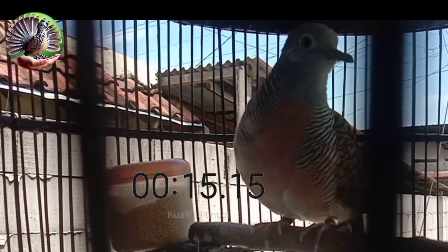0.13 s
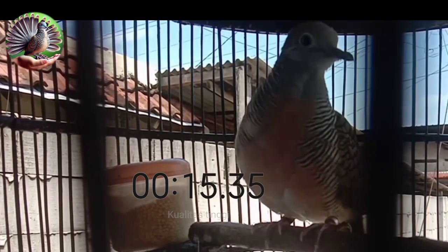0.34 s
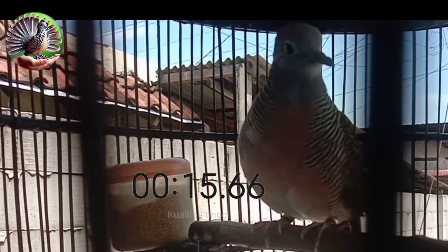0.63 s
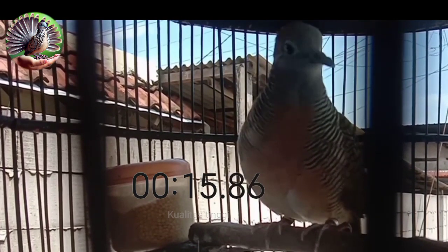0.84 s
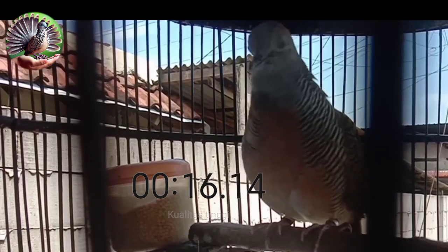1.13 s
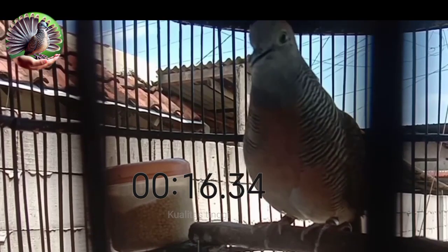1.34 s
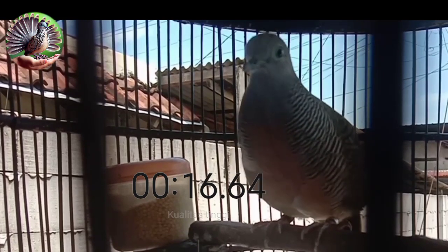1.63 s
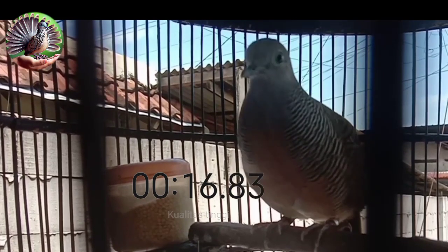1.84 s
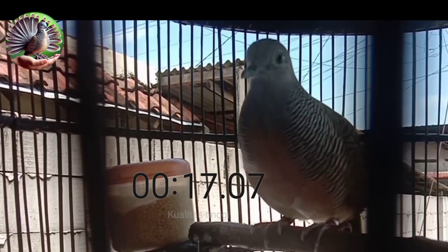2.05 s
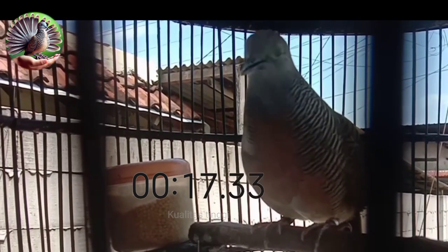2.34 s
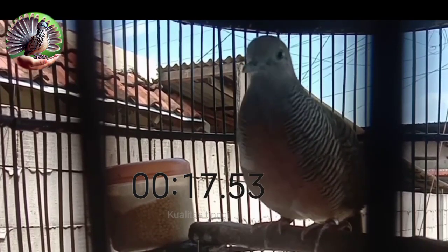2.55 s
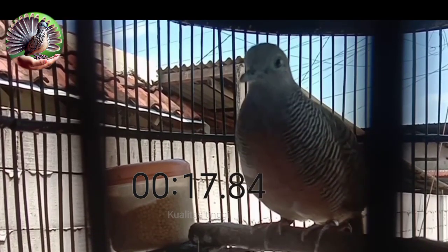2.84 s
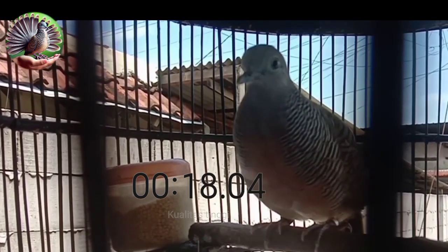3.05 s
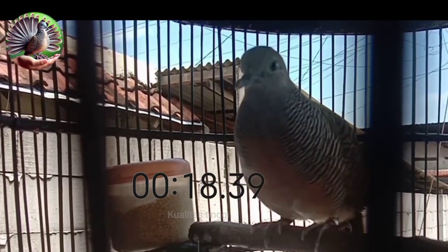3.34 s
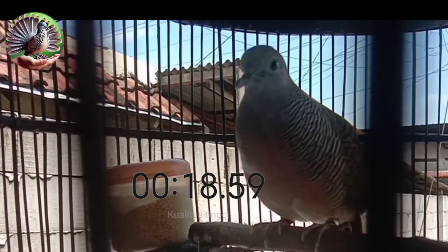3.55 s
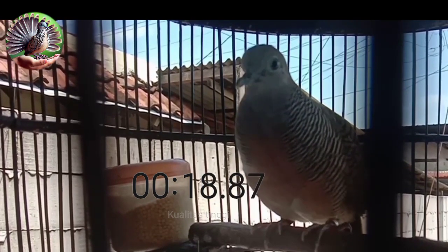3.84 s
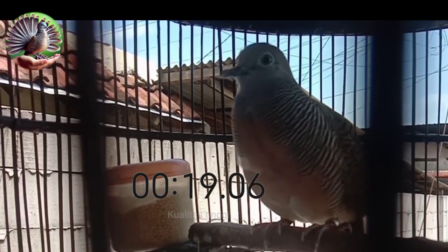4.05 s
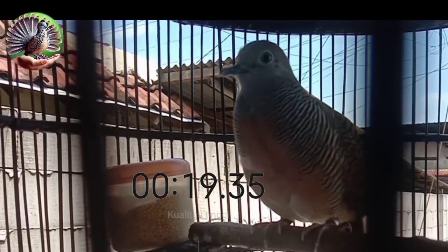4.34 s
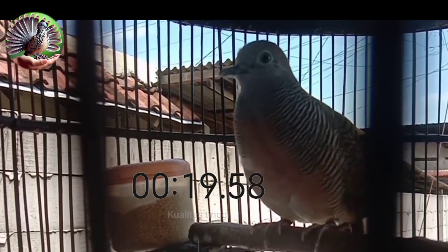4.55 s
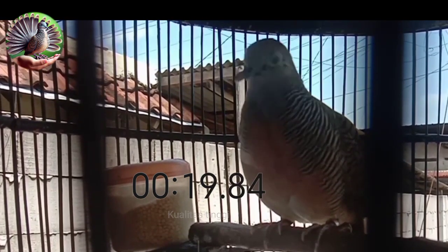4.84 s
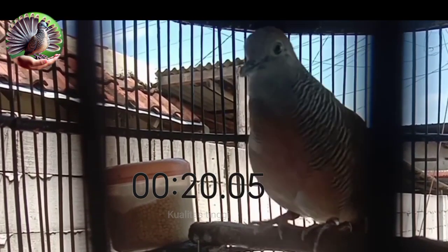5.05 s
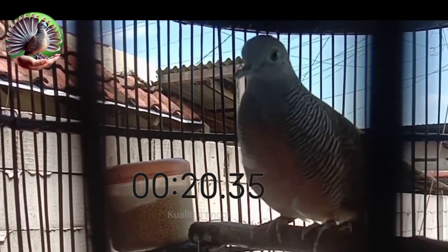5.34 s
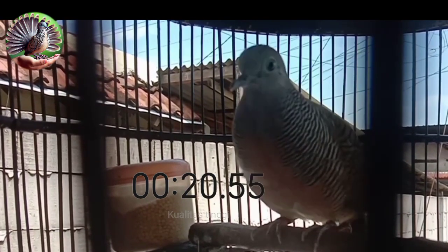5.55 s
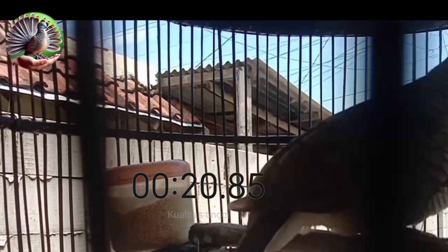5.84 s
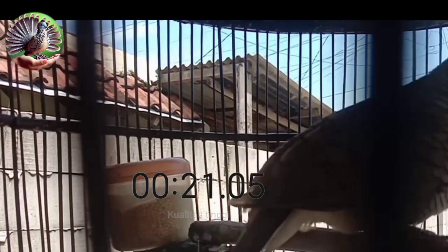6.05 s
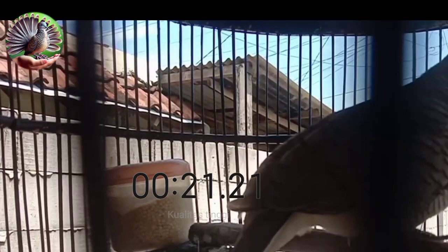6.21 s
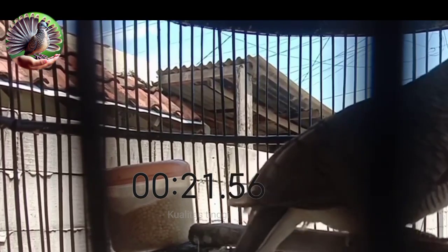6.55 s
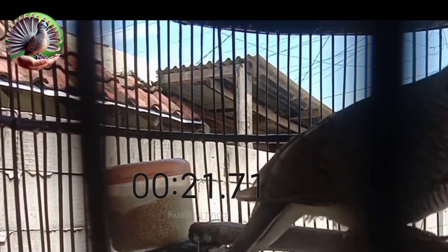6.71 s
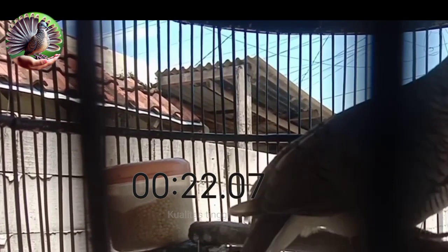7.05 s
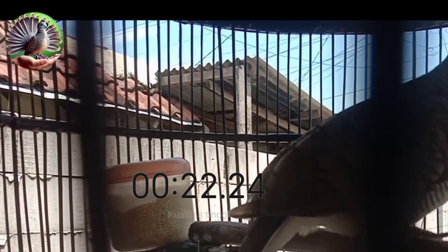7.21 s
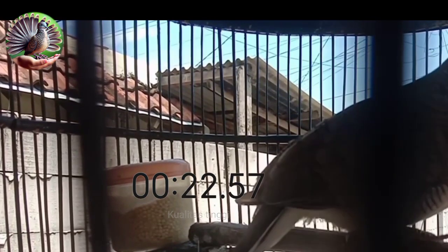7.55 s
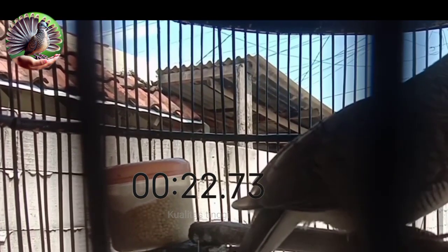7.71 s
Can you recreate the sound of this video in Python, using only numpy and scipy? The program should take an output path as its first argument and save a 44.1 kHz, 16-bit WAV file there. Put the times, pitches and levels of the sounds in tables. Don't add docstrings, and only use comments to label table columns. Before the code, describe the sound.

An outdoor walled yard, heard through a phone microphone close to a cage, with light hiss. From 0 to 1.5 s, low, uneven traffic rumble and hum lie behind small clear notes from a neighbouring dove and fainter distant coos; a tiny scrape comes near 0.2 s. At 1.5 s the near dove rasps and fires six loud, hollow, popping notes until 2.1 s, pitched mostly around 1.2 to 1.3 kHz, the last longer. A second six-note phrase runs 2.5-3.35 s, slightly slower. Cage and walls ring briefly. Traffic roar rises from 3 s while distant doves murmur. The third phrase comes at 5.3-5.9 s. As it ends, a close engine swells in, covering the fading road: about thirty low thumps per second, boomy pipe resonance and dense clatter, strongest thumping near 6.2 s, clatter fullest around 7.2 s, continuing to 8 s. Faint bright scrapes occur at 6.3, 7.1 and 7.7 s.

```python
import sys
import numpy as np
from scipy import signal
from scipy.fft import rfft, irfft, next_fast_len
from scipy.io import wavfile
from scipy.ndimage import uniform_filter1d

SR = 44100
rng = np.random.default_rng(int(sys.argv[2]) if len(sys.argv) > 2 else 0)


def persist_wave(psi):
    counts = np.round(np.clip(psi, -1, 1) * 32767).astype(np.int16)
    wavfile.write(sys.argv[1], SR, np.atleast_2d(counts).T)


def decibels_to_gain(level_db):
    exponent = np.asarray(level_db, float) / 20
    return 10 ** exponent


N = 347419
T = np.arange(N) / SR

# start [s], held tone [s], first pitch [Hz], top pitch [Hz], glide level [dB]
DOVE_NOTES = [(1.583, .04, 892, 1300, -14.5), (1.656, 0.03, 991, 1277, -13.5),
              (1.714, .028, 944, 1247, -13), (1.785, .026, 725, 1221, -13),
              (1.882, 0.036, 752, 1237, -13.5), (2.002, 0.092, 724, 1289, -13),
              (2.596, 0.044, 889, 1291, -15), (2.684, 0.027, 775, 1245, -13.5),
              (2.769, .027, 730, 1233, -13), (2.875, 0.039, 713, 1251, -14),
              (3.005, 0.095, 730, 1284, -14.5), (3.24, 0.091, 794, 1281, -14),
              (5.379, 0.035, 930, 1296, -14), (5.451, 0.035, 986, 1280, -13.5),
              (5.504, 0.033, 941, 1237, -13.5), (5.581, 0.033, 759, 1221, -14.5),
              (5.682, 0.037, 734, 1236, -13.5), (5.806, 0.09, 706, 1279, -15)]


def unit(x):
    return x / np.sqrt(np.mean(x ** 2))


def colour(x, points):
    hz, db = np.transpose(points)
    size = next_fast_len(len(x))
    f = np.arange(size // 2 + 1) * SR / size + 1
    gain = decibels_to_gain(np.interp(np.log(f), np.log(hz), db, left=-90, right=-90))
    return irfft(rfft(x, size) * gain, size)[:len(x)]


def walk(rate):
    k = max(int(SR / rate), 130)
    held = np.repeat(rng.standard_normal(N // 128), k)[:N]
    return uniform_filter1d(uniform_filter1d(held, k), k)


def band(hz, width):
    b, a = signal.iirpeak(hz, hz / width, SR)
    once = signal.lfilter(b, a, rng.standard_normal(N))
    return unit(signal.lfilter(b, a, once))


def patchy(points, flicker_db, rate):
    spread, size = np.log(2) / 3, next_fast_len(N)
    f = np.log(np.arange(size // 2 + 1) * SR / size + 1)
    full = rfft(colour(rng.standard_normal(N), points), size)
    out = np.zeros(N)
    for centre in np.arange(np.log(points[0][0]), np.log(points[-1][0]) + spread, spread):
        share = np.clip(1 - abs(f - centre) / spread, 0, 1)
        out += irfft(full * share, size)[:N] * decibels_to_gain(flicker_db * walk(rate))
    return unit(out)


def bump(start, length, edge):
    return np.sin(np.pi / 2 * np.clip(np.minimum(T - start, start + length - T) / edge, 0, 1)) ** 2


def yard(x, t60, wet_db):
    t = np.arange(SR) / SR
    tail = colour(rng.standard_normal(SR), [(100, 26.5), (1400, -4.5), (2400, -7), (8000, -25)])
    tail = tail * decibels_to_gain(-60 * t / t60) * np.clip(t / .05, 0, 1)
    return decibels_to_gain(wet_db) * signal.fftconvolve(x, tail / np.sqrt(np.sum(tail ** 2)))[:N]


def microphone():
    # frequency [Hz], density [dB per Hz]
    hiss = [(3000, 4), (5000, 2.5), (6500, -4), (8000, -6), (10500, -2.5), (13000, -6.5), (15600, -8.5)]
    # frequency [Hz], level [dB]
    whine = [(6722, -103), (13443, -99)]
    out = decibels_to_gain(-80) * decibels_to_gain(1.6 * walk(14)) * patchy(hiss, 1.5, 9)
    return out + sum(decibels_to_gain(db + 3) * np.sin(2 * np.pi * hz * T) for hz, db in whine)


def traffic():
    # time [s], level
    # [dB]
    flow = [(0, -10), (.6, -6.5), (1.3, -7.5), (1.6, -11.5), (1.82, -21), (2.0, -9.5), (2.5, -7.5),
            (3.0, 5), (3.33, -5), (3.45, 3.5), (3.9, 3), (4.4, 2.5), (4.9, -1.5), (5.3, 2), (5.9, -6)]
    # start [s], length [s], gain [dB]
    lorries = [
        (.1, 0.12, 11.5),
        (.6, 0.33, 6),
        (0.998, 0.19, 4.5),
        (1.31, 0.25, 7),
        (2.454, 0.17, 6),
        (3.4, .25, 4),
        (4.36, .2, 1),
    ]
    # frequency [Hz], density [dB per Hz]
    rumble = [(12, -55), (20, -24), (38, -30), (64, -7.5), (141, -1.5), (159, -0.5), (182, -8),
              (260, -12.5), (340, -48.5), (570, -120)]
    hum = [(120, -43.5), (200, -15), (279, -13), (377, -3.5), (591, -5.5), (736, -7.5), (880, -5.5),
           (1070, -31.5), (1230, -1.5), (1400, -27.5), (1820, -45.5), (3080, -120)]
    tyres = [(900, -3.5), (1270, 8), (1500, -1.5), (1840, -3), (2400, -5), (3000, -12.5), (3570, -17.5),
             (4300, -28), (5100, -29), (6000, -40.5)]
    rumble_db, hum_db, tyre_db = -57, -56, -63
    flow_db = np.interp(T, *np.transpose(flow))
    lorry_db = sum(db * bump(s, d, 0.087) for s, d, db in lorries)
    fade = np.interp(T, [5.9, 6.2], [0, -20])
    out = decibels_to_gain(rumble_db + .15 * flow_db + lorry_db + fade) * patchy(rumble, 6.0, 8)
    out += decibels_to_gain(hum_db + flow_db + fade) * patchy(hum, 4.5, 11)
    out += decibels_to_gain(tyre_db + .45 * flow_db + fade) * patchy(tyres, 3.5, 12)
    builds_db = np.interp(T, [2.9, 3.2], [-14, 0])
    return out + decibels_to_gain(tyre_db - 9.0 + .4 * flow_db + fade + builds_db) * band(2330, 220)


def far_doves():
    # start [s], length [s], pitch [Hz], level [dB]
    answers = [(0, 0.051, 978, -53.5), (.1, 0.52, 670, -72.5), (0.448, 0.29, 880, -63),
               (.5, 0.13, 726, -61), (0.528, 0.28, 962, -58), (.54, 0.14, 1925, -71.5),
               (0.663, 0.077, 1407, -56.5), (.77, 0.16, 2740, -73), (0.797, 0.086, 1286, -62.5),
               (.92, 0.093, 1670, -68), (0.971, 0.078, 1329, -54), (0.99, 0.19, 2745, -69.5),
               (1.098, 0.38, 660, -74), (1.111, 0.14, 932, -58.5), (1.14, .14, 1555, -67),
               (1.15, 0.1, 1413, -61), (1.375, 0.056, 390.4, -60), (1.376, 0.06, 845, -63.5),
               (1.456, 0.16, 880, -58), (2.258, 0.27, 690, -64.5), (2.196, 0.29, 499, -68),
               (2.296, 0.068, 960, -55), (2.513, 0.089, 3550, -69), (3.446, 0.19, 883, -54),
               (3.703, 0.1, 429, -60.5), (4.21, 0.45, 590.7, -60.5), (4.488, 0.22, 857, -55.5),
               (4.495, 0.24, 785, -62.5), (4.78, 0.15, 594, -55.5), (4.8, 0.12, 790, -62)]
    # start [s], length [s], pitch [Hz], level [dB]
    neighbour = [
        (-.02, 0.096, 1230, -45.5),
        (0.106, 0.078, 1297, -37.5),
        (0.207, 0.076, 1287, -49),
        (0.304, 0.019, 1295, -38),
        (0.343, 0.033, 1275, -35),
        (.43, 0.04, 1272, -44),
    ]
    out, flutter = np.zeros(N), decibels_to_gain(1.5 + 0.91 * walk(30))
    drift = np.cumsum(1 + .012 * walk(40)) / SR
    for s, d, hz, db in answers:
        coo = 1.1 * np.sin(2 * np.pi * hz * drift) + 0.63 * band(hz, 55)
        out += decibels_to_gain(db) * flutter * bump(s - .01, d + 0.012, 0.044) * coo
    waver, halo = np.cumsum(1 + 0.0083 * walk(60)) / SR, .5 * band(1275, 55)
    near = np.zeros(N)
    for s, d, hz, db in neighbour:
        swell = np.clip((T - s) / 0.016, 0, 1) ** 2 * decibels_to_gain(-300 * np.clip(T - s - d, 0, 1))
        near += decibels_to_gain(db) * swell * (1.1 * np.sin(2 * np.pi * hz * waver) + halo)
    return out + yard(out, 0.25, -2.5) + near


def engine():
    # time [s], firing rate [Hz], thump level [dB], boom resonance [Hz]
    idle = [
        (5.84, 28.86, -46, 147.6),
        (5.96, 28.82, -34, 127),
        (6.15, 29.2, -27.5, 119.2),
        (6.46, 29, -31.5, 117),
        (6.62, 29.47, -34.5, 91),
        (6.98, 29.85, -39, 88),
        (7.2, 29.97, -34, 120),
        (7.5, 29.9, -34, 88.4),
        (7.75, 30.74, -34, 147),
    ]
    # frequency [Hz], gain [dB]
    exhaust = [(25, -20), (58, -6), (88, -5.5), (118, 1.5), (150, -11), (180, -9), (230, -26), (400, -35)]
    # frequency [Hz], density [dB per Hz]
    rattle = [(88, -32), (150, -3), (236, -3.5), (290, -1), (422, -11.5), (519, -3), (708, -8), (775, -7.5),
              (1230, -4.5), (1460, -13.5), (2020, -19), (2270, -13), (3300, -32), (4290, -70), (7260, -120)]
    whirr = [(3000, -12), (3800, 3.5), (4400, -3.5), (5100, 3), (5900, -17.5), (8000, -27), (10000, -11),
             (11500, -17), (13000, -25.5), (15000, -16), (16000, -6.5)]
    s, *columns = np.transpose(idle)
    hz, thump_db, boom_hz = (np.interp(T, s, c) for c in columns)
    turns = np.cumsum(hz * (1 + .012 * walk(30))) / SR

    strength = decibels_to_gain(3.2 * rng.standard_normal(300))[turns.astype(int)]
    fires = np.diff(np.floor(turns), prepend=0) * strength
    thump = unit(colour(fires, exhaust))
    thump = unit(thump + yard(thump, .4, -11))

    pipe_hz = 275 * (1 + .06 * walk(4))
    pipe_db = -50 + 8.5 * np.tanh((T - 6.77 + 0.16) / 0.26) / 2
    pipe = np.zeros(N)
    for k in range(6, 20):
        level = decibels_to_gain(-.5 * ((k * hz - pipe_hz) / 40) ** 2 + 6.8 * walk(9))
        pipe += level * np.sin(2 * np.pi * k * (turns + 0.41 * walk(5) / k))

    boom, boom_width_hz = np.zeros(N), 17
    for k in range(2, 7):
        boom += np.exp(-.5 * ((k * hz - boom_hz) / boom_width_hz) ** 2) * np.sin(2 * np.pi * k * turns)

    arrives_db = -14 * np.exp(-np.clip(T - 5.88, 0, 9) / 0.063)
    nearest_db = 2 * np.exp(-((T - 7.165) / 0.4) ** 2)
    clatter_db = -36.5 + arrives_db + nearest_db
    puff = 1 + 0.089 * np.cos(2 * np.pi * turns - .6)
    clatter = unit(puff * patchy(rattle, 2.4, 12)) + decibels_to_gain(-10.5) * band(1263, 70)

    out = decibels_to_gain(thump_db - 5.5) * thump
    out += decibels_to_gain(thump_db - 4.5 + 1.9 * walk(12)) * boom
    out += decibels_to_gain(pipe_db + 3.5) * unit(pipe)
    out += decibels_to_gain(clatter_db) * clatter
    out += decibels_to_gain(clatter_db - 34) * patchy(whirr, 3.9, 25) * decibels_to_gain(1.8 * walk(90))
    return np.clip((T - s[0]) / 0.062, 0, 1) * out


def scrapes():
    # start [s], length [s], level [dB]
    touches = [
        (0.243, 0.05, -73.5),
        (6.343, .05, -82),
        (7.118, 0.03, -67),
        (7.725, .03, -78),
    ]
    grains = rng.standard_normal(N) * decibels_to_gain(2.2 * rng.exponential(size=N))
    bright = unit(colour(grains, [(1500, -16.0), (2500, 6.0), (6500, -8.0), (8500, -10.0), (10000, 2.0),
                                  (12000, -9.5), (15000, -9)]))
    level = np.zeros(N)
    for s, d, db in touches:
        level += decibels_to_gain(db - 190 * np.clip(T - s - d, 0, 1)) * np.clip((T - s) / .012, 0, 1)
    return bright * level


def throat_noise():
    # start [s], length [s], centre [Hz], level [dB]
    rasps = [
        (1.513, 0.019, 1153, -41),
        (1.559, 0.022, 999, -27.5),
        (2.522, 0.035, 915, -49.5),
        (2.576, 0.025, 985, -30.5),
        (3.222, .017, 904, -31.5),
        (5.308, 0.02, 1040, -44.5),
        (5.358, 0.022, 1075, -28.5),
    ]
    pop = unit(colour(rng.standard_normal(N), [(200, -27.5), (300, -9), (600, -21.5), (1000, 8.0), (1600, -9.5),
                                               (2500, -28.5), (3500, -45.0)]))
    puffs = sum(bump(s - .009, .016, 0.003) for s, *_ in DOVE_NOTES)
    rough = np.zeros(N)
    for s, d, hz, db in rasps:
        strong = db > -40
        breath = band(hz, 168.5 + 130 * strong) + strong * .45 * pop
        rough += decibels_to_gain(db) * bump(s, d + 0.0074, 0.013) * breath
    return decibels_to_gain(-40.0) * puffs * pop + colour(rough, [(100, 8.5), (3000, 0), (4200, -31.5), (8000, -62.5)])


def dove_notes():
    # multiple of the pitch, level [dB]
    overtones = [(2, -53), (3, -59.5), (4, -70), (5, -77), (6, -90), (7, -78.5), (8, -79), (9, -77.5)]
    ring_s, ring_db_per_s = 0.027, 416.5
    out, wobble, before = np.zeros(N), walk(250), 0
    for start, hold, first_hz, top_hz, glide_db in DOVE_NOTES:
        glide = .028 if start - before > .4 else .014 - (first_hz - 730) / 85000
        before, end = start, glide + hold
        t = np.arange(int((end + ring_s) * SR)) / SR
        i = int(start * SR)

        knots = [0, .5 * glide, glide, glide + .003, glide + .28 * hold, glide + .72 * hold, end]
        arch = [top_hz - 480 * hold - 8, top_hz, top_hz - 270 * hold, top_hz - 880 * hold]
        hz = np.interp(t, knots, [first_hz, max(first_hz + 70, 985), 1120, *arch])
        hz = uniform_filter1d(hz, size=130, mode="nearest")
        closed = np.interp(t, [glide - .002, glide + .004], [1, 0])

        sac_db = 11.5 * (1 - closed) * np.exp(-((hz - 1210.6) / 42.6) ** 6)
        sac_db += 9.5 * np.exp(-((hz - 1300) / 19) ** 2)
        hz = hz * (1 + 0.023 * closed * wobble[i:i + len(t)])
        phase = 2 * np.pi * np.cumsum(hz) / SR

        snap_db, end_db = -14.5, -19.5 + 85.5 * hold
        cut_db = end_db - 71 * hold
        shape = np.interp(t, [0, .007, glide - .004, glide - .001, glide + .004, end, end + .006, end + ring_s],
                          [-26, -5.5, 2.2, 1.2, snap_db, end_db, cut_db, cut_db - ring_db_per_s * ring_s])
        level_db = glide_db + uniform_filter1d(shape + sac_db, size=90, mode="nearest")
        tone = decibels_to_gain(level_db + 1.0) * np.sin(phase) * np.clip((t[-1] - t) / 0.0046, 0, 1)

        blown = np.clip((end + 0.0013 - t) / 0.017, 0, 1)
        for k, part_db in overtones:
            part_db = part_db - 10.0 * (k - 2.0) * closed
            part_db = part_db - (k > 4) * (0.13 * (1290.5 - hz) + 6.0 * (hold < .07))
            part_db = part_db + 3.5 * wobble[i + 999 * k:][:len(t)]
            tone += blown * decibels_to_gain(part_db) * np.sin(k * phase)
        out[i:i + len(t)] += np.clip(t / 0.0026, 0, 1) * tone
    return out


def cage(x):
    # frequency [Hz], level [dB], 60 dB decay time [s]
    modes = [(1064, -17.5, 0.15), (960, -38, 0.55), (1251, -19.5, 0.21), (1213, -30, .6)]
    # delay [s], level [dB]
    echoes = [(.011, -10), (0.031, -24), (.057, -30), (.088, -25)]
    t = np.arange(SR // 2) / SR
    response = np.zeros(len(t))
    for hz, db, t60 in modes:
        gain = 10 * decibels_to_gain(db) * 2 * np.log(1000) / t60 / SR
        response += gain * decibels_to_gain(-60 * t / t60) * np.sin(2 * np.pi * hz * t)
    for delay, db in echoes:
        response[int(delay * SR)] += decibels_to_gain(db)
    response = colour(response, [(50, -12.5), (1500, 3.5), (2400, -16.5), (20000, -19)])
    return x + signal.fftconvolve(x, response)[:N]


def scene():
    background = microphone() + traffic() + far_doves() + engine() + scrapes()
    voice = dove_notes() + throat_noise()
    return (background + cage(voice) + yard(voice, t60=0.91, wet_db=-18))[None]


def band_limit(x):
    return signal.sosfilt(signal.butter(12, 15500, fs=SR, output="sos"), x)


def record(dry):
    return band_limit(dry)


dry = scene()
out = record(dry)
persist_wave(out)
```